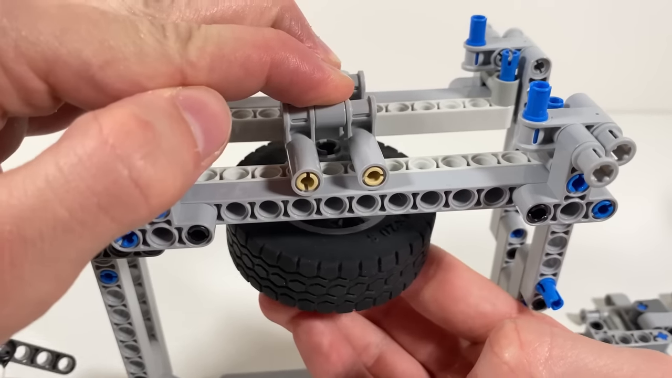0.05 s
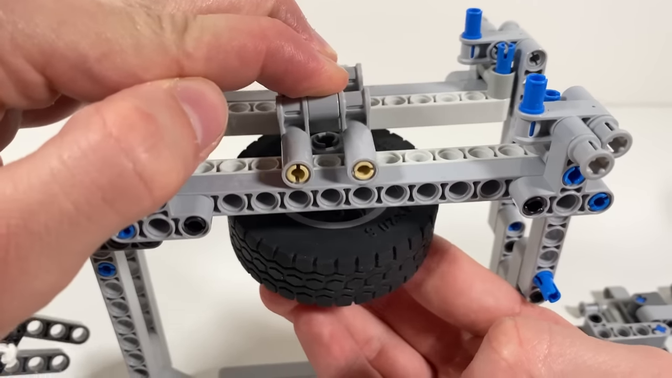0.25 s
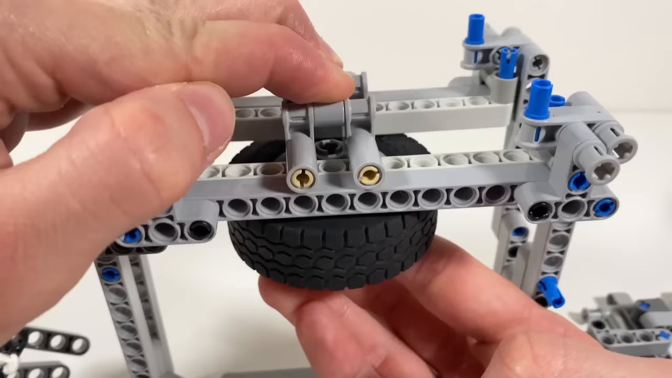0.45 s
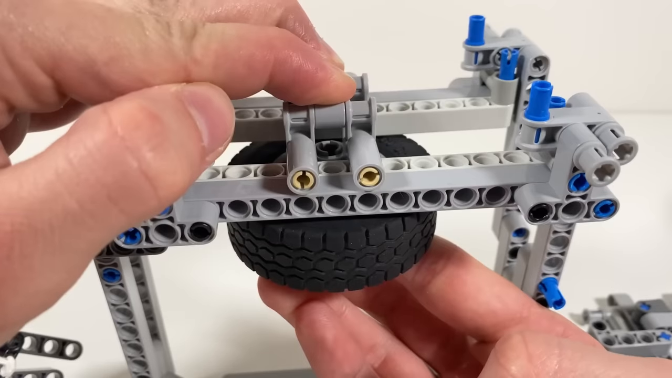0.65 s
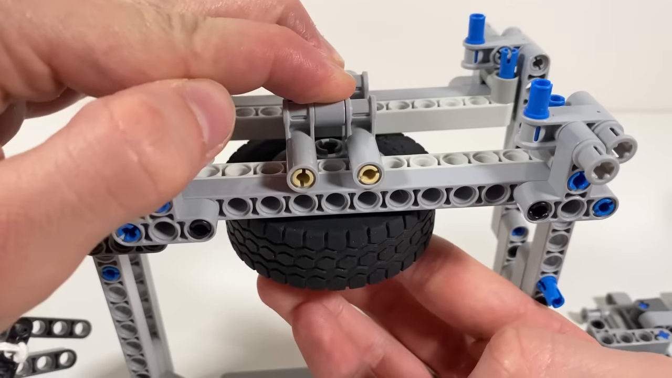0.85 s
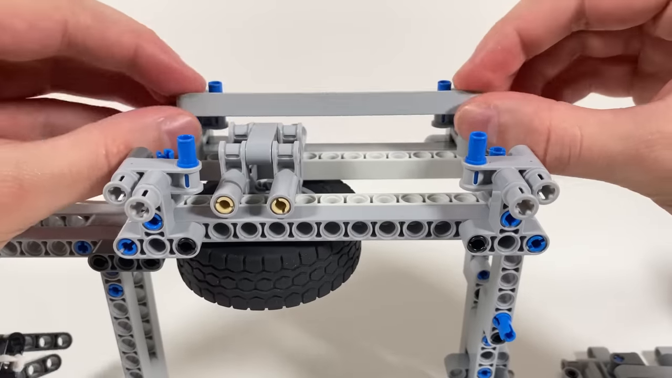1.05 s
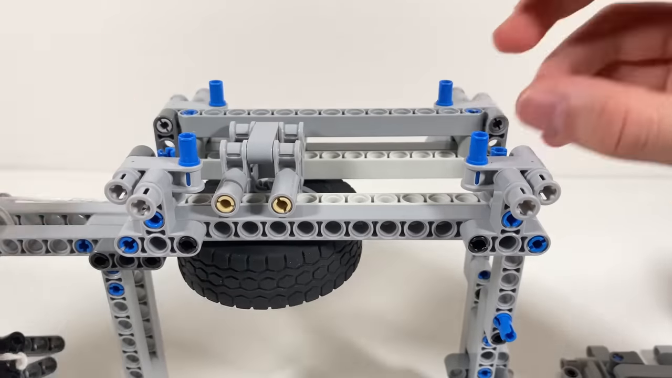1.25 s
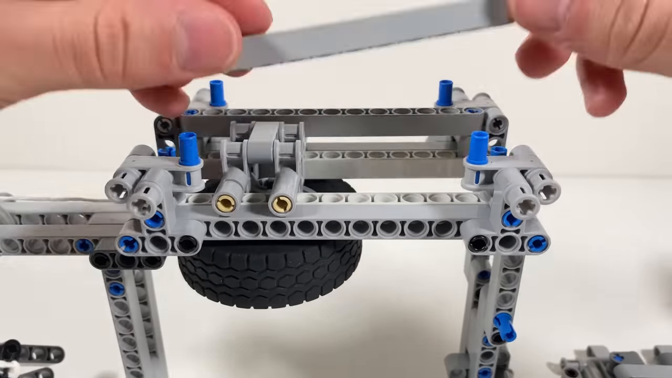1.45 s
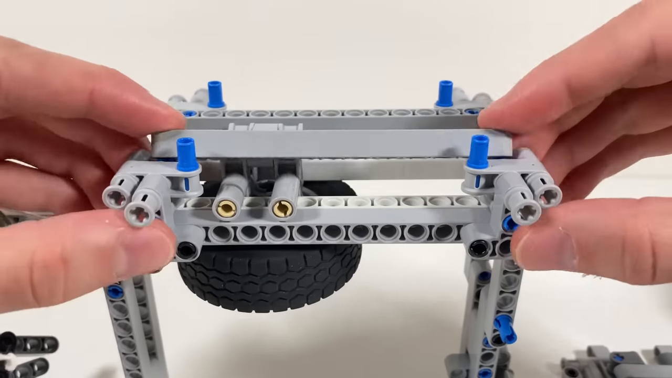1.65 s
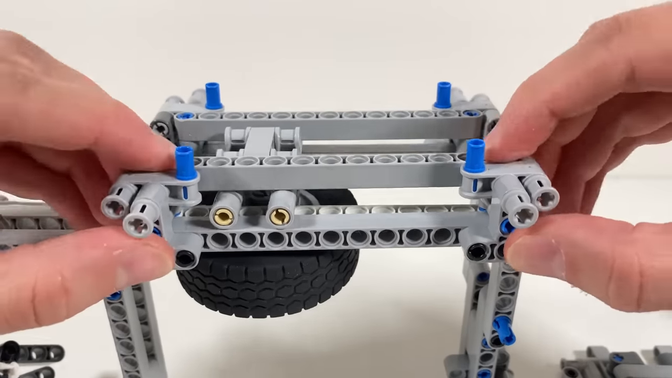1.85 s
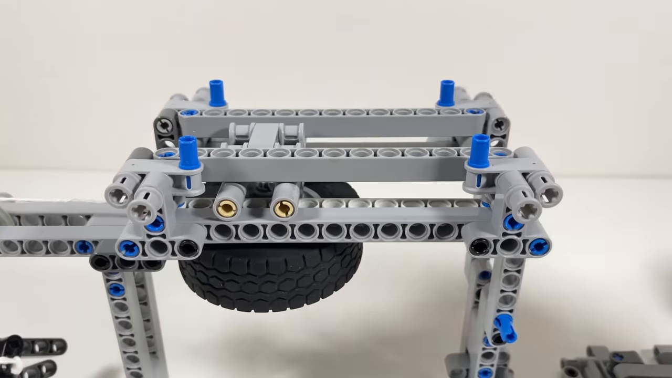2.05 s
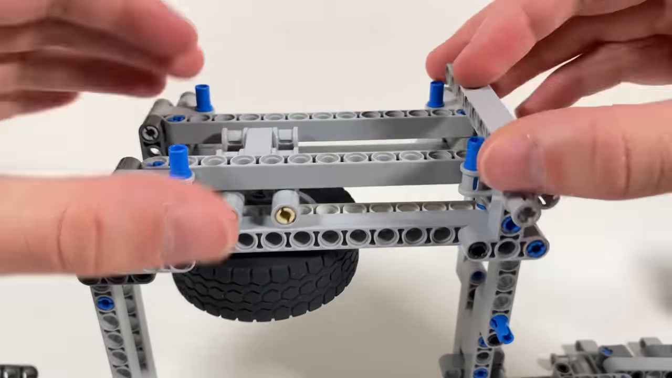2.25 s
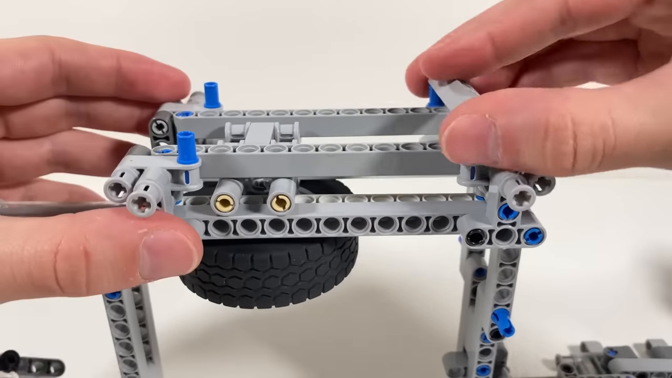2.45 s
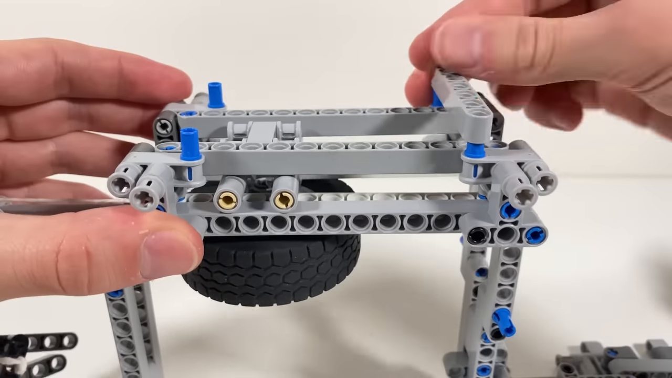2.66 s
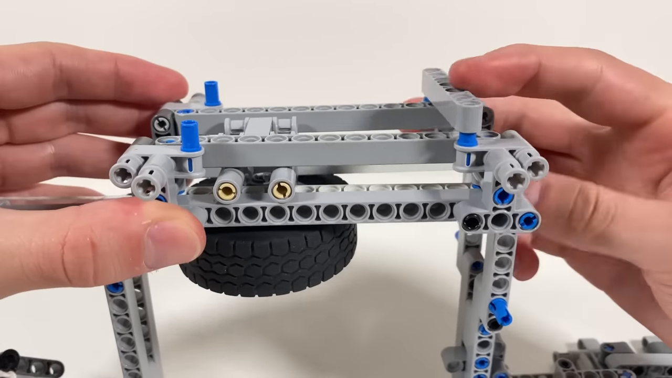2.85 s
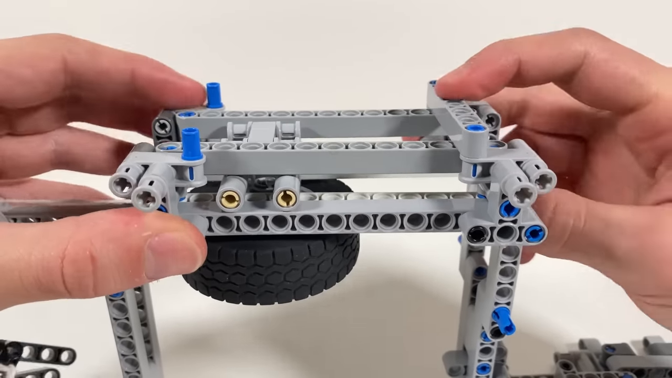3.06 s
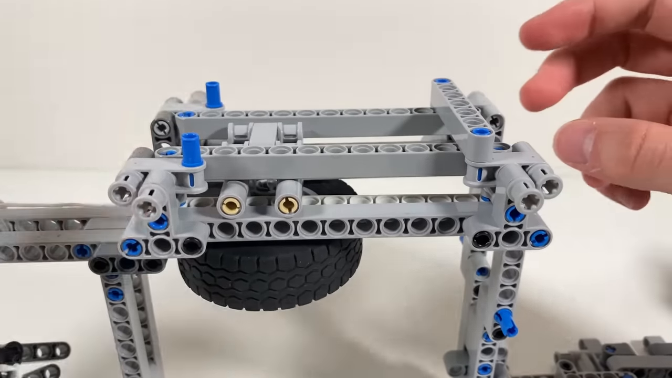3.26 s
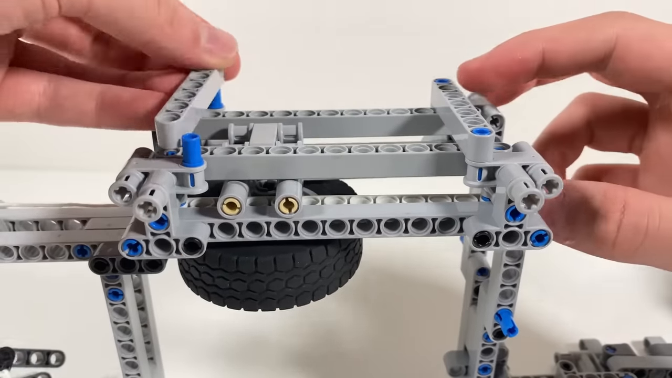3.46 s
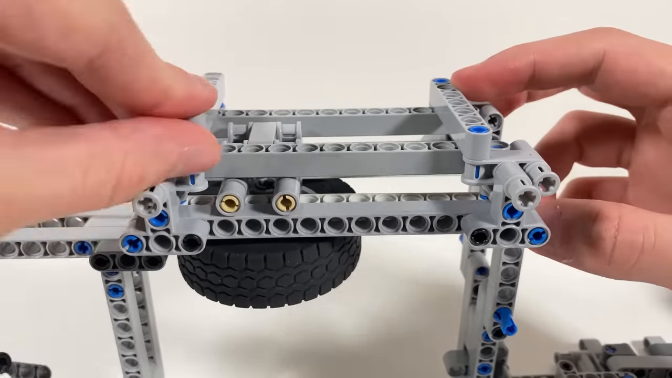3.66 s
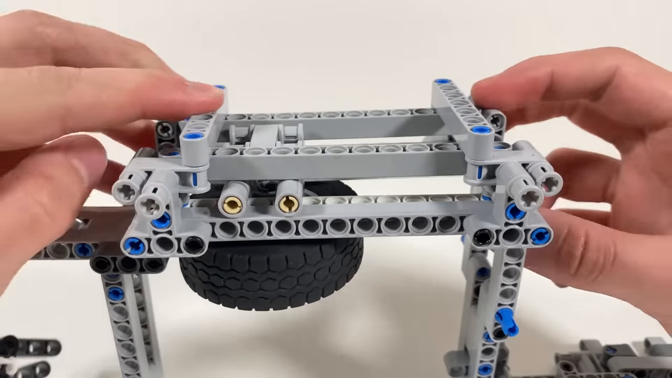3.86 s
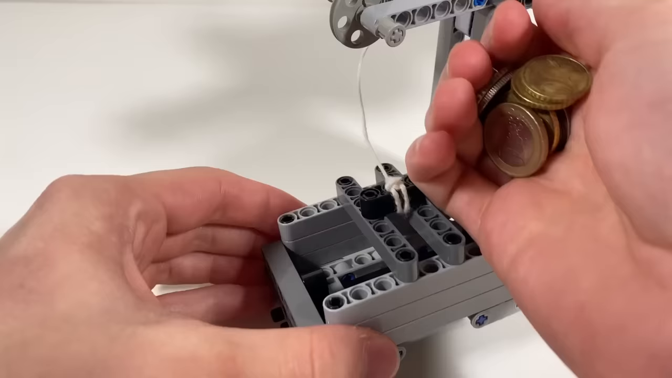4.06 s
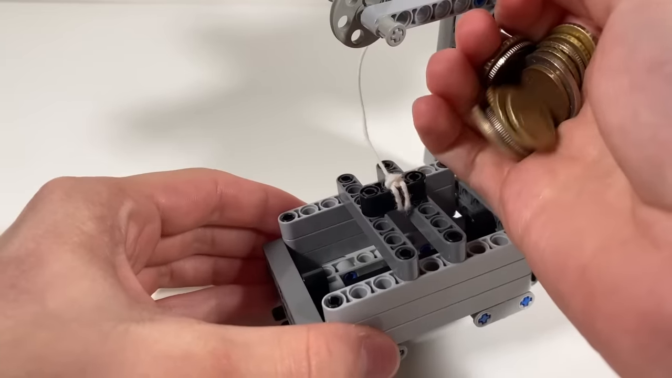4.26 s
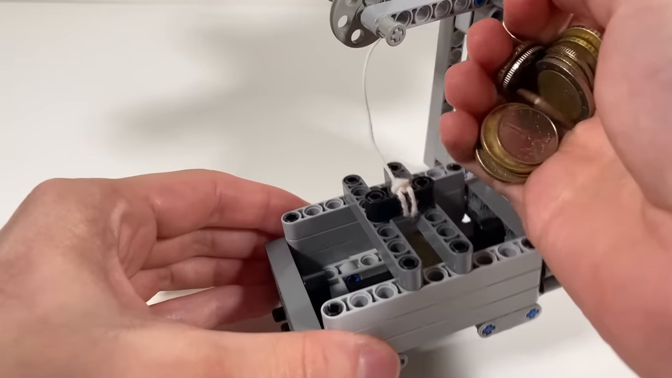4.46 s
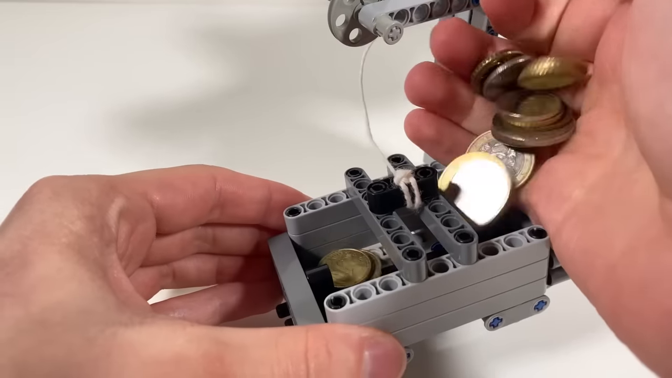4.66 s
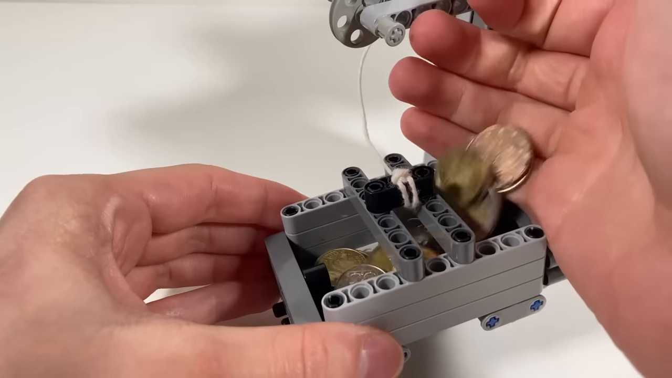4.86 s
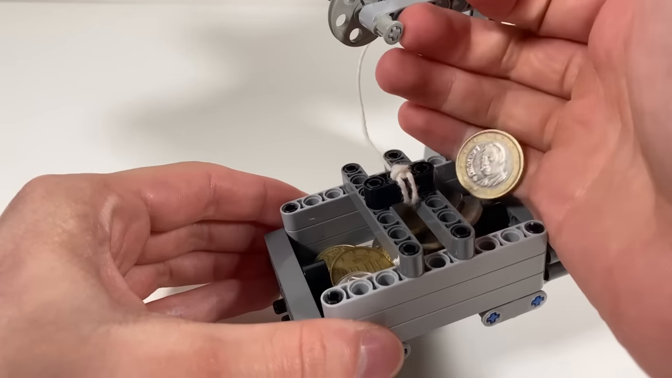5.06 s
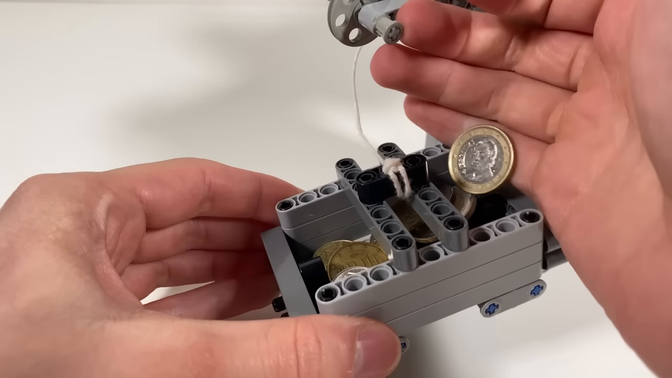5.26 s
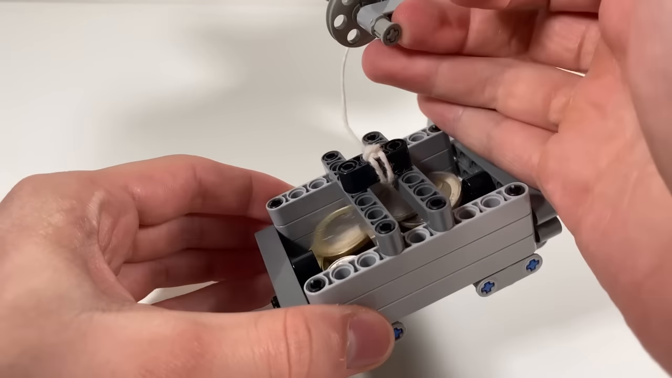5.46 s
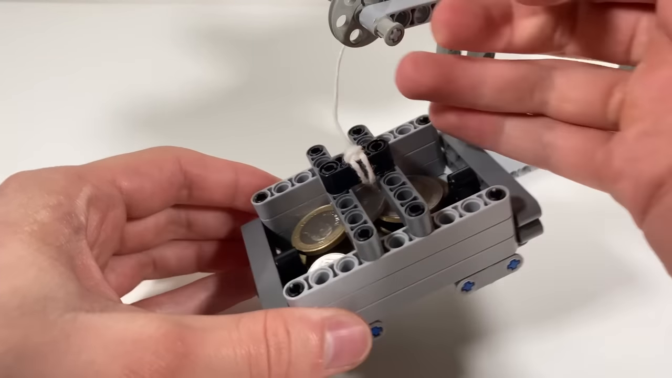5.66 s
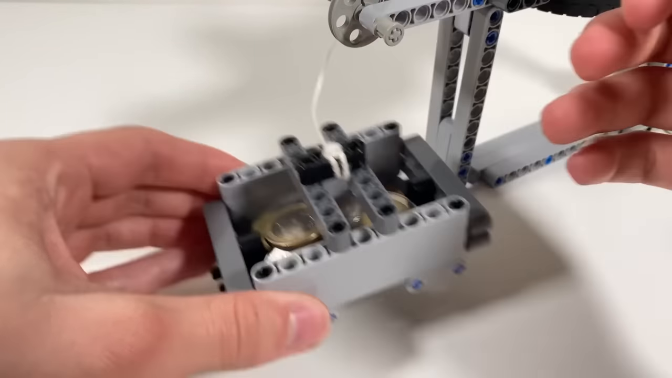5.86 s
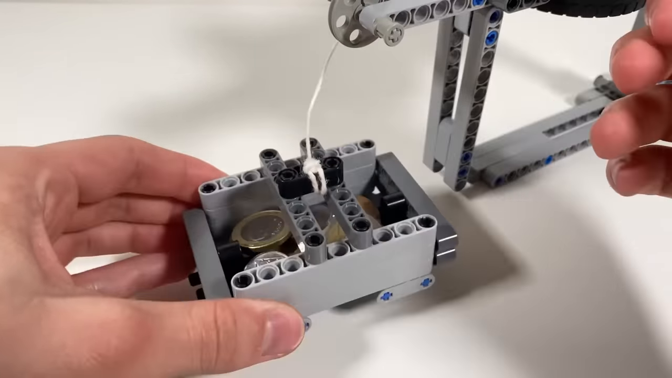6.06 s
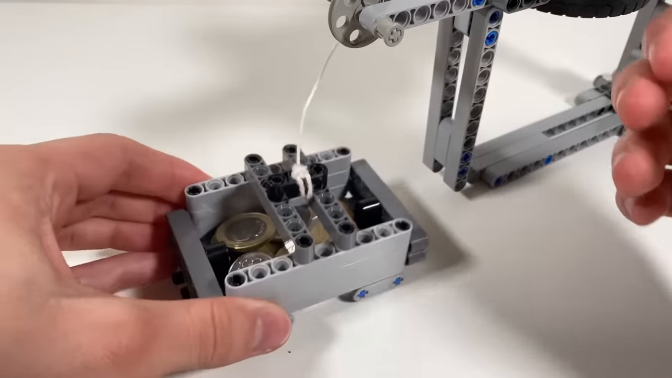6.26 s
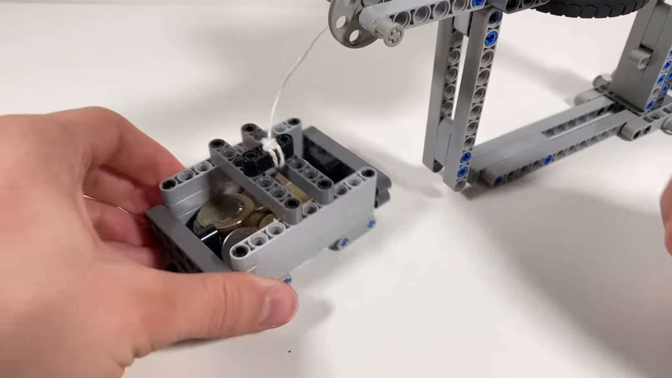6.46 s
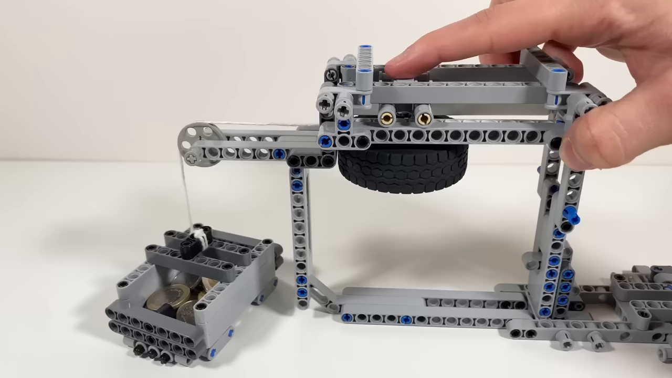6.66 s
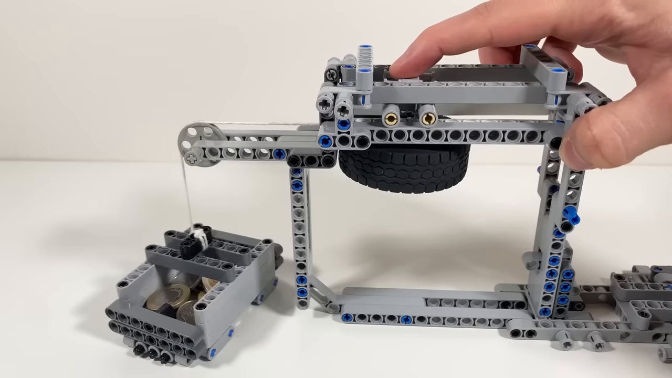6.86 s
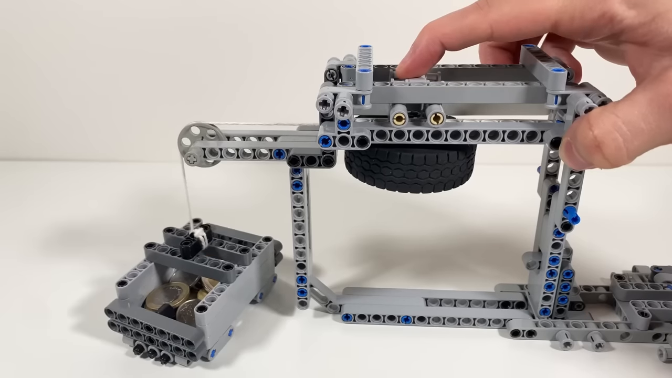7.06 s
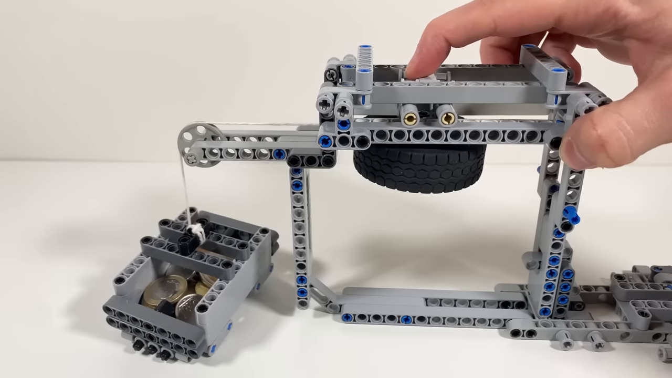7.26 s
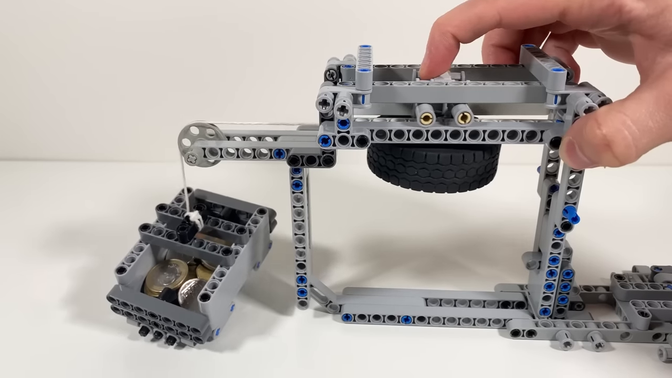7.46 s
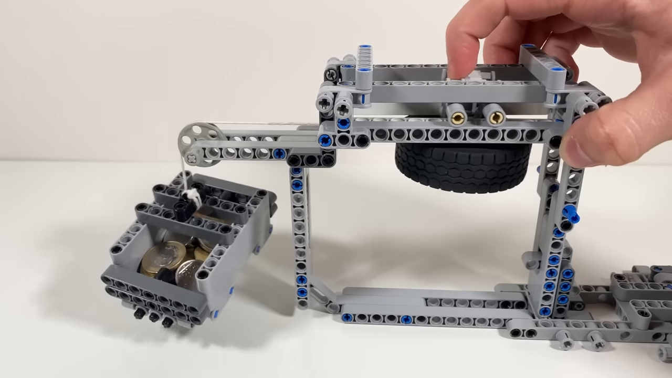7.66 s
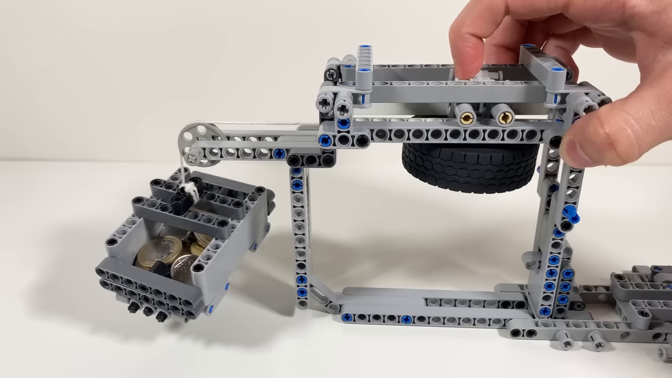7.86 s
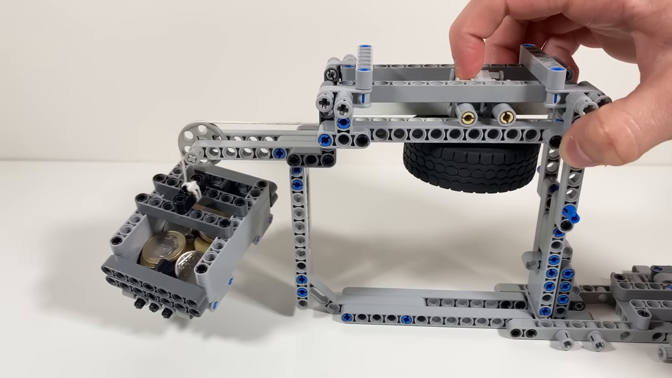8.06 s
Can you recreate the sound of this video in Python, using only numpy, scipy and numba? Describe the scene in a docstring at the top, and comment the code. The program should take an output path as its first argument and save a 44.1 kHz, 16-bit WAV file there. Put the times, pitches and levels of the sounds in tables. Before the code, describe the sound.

Five abruptly cut close stereo shots at an indoor table, over faint steady air noise. At 0.1 s a plastic wheel pushed into a frame thumps loudly and booms, with a cracking plastic knock at 0.4 s, then weak rumbling. From 0.95 to 4 s the sound is dry and thin: plastic beams tick, rattle and snap onto pins, strongest near 1.2, 1.75, 1.85, 2.3, 2.9 and 3.85 s. From 4.15 s coins clink into a plastic box, bright and dense from 4.45 to 5 s, then sparse, with another cluster at 5.3-5.55 s. Around 5.85-6.1 s the box jostles, coins jingling over low rumble; it lands with a knock at 6.3 s and rubs grittily until 6.7 s. Then nearly quiet: a tiny pulley squeak at 6.85 s, faint rumbles and light ticks as it is winched up, until just after 8 s.

```python
"""Plastic beams snap onto pins on a table top: each snap rings three bands of beam modes, over random small ticks.
Coins ring and knock as they are poured into a plastic box, which is set down, slid along and winched up.
A wheel pushed home in a plastic frame booms in the table, which later rumbles faintly; rubbing is noise and grains.
Five hard-cut shots, each with its own room tail and low cut, are heard close by in stereo over steady air noise."""
import sys
import numpy as np
from scipy import signal
from scipy.fft import rfft, irfft, next_fast_len
from scipy.io import wavfile
from scipy.ndimage import uniform_filter1d
from numba import njit

SR = 44100
rng = np.random.default_rng(int(sys.argv[2]) if len(sys.argv) > 2 else 0)


def to_wav(s):
    """Save 16-bit WAV."""
    ch = np.atleast_2d(s).T  # columns
    pcm = np.round(np.clip(ch, -1, 1) * 32767)  # PCM
    wavfile.write(sys.argv[1], SR, pcm.astype(np.int16))


N = 357651
LEAD = 300  # samples of grazing before the main contact

# shots, each lasting until the next: [start t/s, room t60/s, room level/dB, low cut f/Hz, right channel delay/ms]
SHOTS = [(0, 0.5, -12, 41.2, 0.06), (0.938, 0.067, -11.5, 302, 0.063), (4.068, 0.17, -4.5, 57.2, 0.11),
         (5.752, 0.13, -5.5, 46.7, 0.175), (6.682, 0.15, -6, 45, 0.17)]
# nominal modes of plastic beam, coin box and table top: [f/Hz, relative level/dB, t60/s]
BEAM = [(404, -16, 0.005), (612, -8.5, 0.016), (752, -2.5, 0.043), (1099, -5.5, 0.082), (1440, 3, 0.012),
        (1863, 8.5, 0.012), (2345, -2.5, 0.034), (2900, -4.5, 0.018), (3560, -4.5, 0.025),
        (5160, 0.5, 0.011), (6020, -1.5, 0.003), (7800, 5.5, 0.0034), (10300, -4.5, 0.003)]
BOX = [(878, -16, 0.1), (1357, -1.5, 0.036), (2376, -7, 0.02), (3130, 13, 0.011), (3410, 11.5, 0.02),
       (4070, 18, 0.0068), (5060, 19, 0.0087), (5930, 11.5, 0.004)]
TABLE = [(78, -7.5, 0.16), (118.8, -1, 0.16), (165, -1.5, 0.04), (191, 0.5, 0.09), (233, 3.5, 0.13),
         (278, 3.5, 0.053), (393, 4, 0.044), (484, 0.5, 0.034), (568, -3, 0.03), (800, 0.5, 0.03),
         (1150, -8, 0.029), (1590, -1.5, 0.013)]


def snaps():
    """Pins click into beams; where the beam is held decides which modes sound. Small ticks fill in at random."""
    # plastic snaps: [t/s, middle modes peak level/dB, low modes level/dB, high modes level/dB; both re middle]
    snap_events = [(0.941, -42.5, 9, -2), (0.96, -28, -35, 6), (0.998, -21.5, -38, -9),
                   (1.022, -24, -8, -5), (1.069, -20, -32, -8), (1.105, -25, -26, -5),
                   (1.122, -14.5, -11.5, -1), (1.131, -20.5, -7.5, 2.5), (1.14, -23, -5, -2),
                   (1.175, -27.5, -18.5, -4.5), (1.19, -27, -25, -10), (1.228, -10, -4, -9),
                   (1.264, -22.5, -1, -3.5), (1.299, -33.5, -5, -27), (1.353, -17.5, -9, -2.5),
                   (1.538, -56, 15, 11.5), (1.597, -34, -2.5, -24), (1.639, -20, -6, -8.5),
                   (1.695, -36, -14.5, 4.5), (1.719, -28, -27, 1), (1.738, -23.5, -9.5, 2),
                   (1.7447, -6, -17.5, -12), (1.809, -28, -10, -4.5), (1.834, -7, -5, 0.5),
                   (1.901, -42, -19, 15), (1.941, -31, -5, 3), (1.998, -28.5, -4.5, -8),
                   (2.039, -41, 2.5, 12.5), (2.252, -21.5, -7, -2), (2.273, -7, -5, -1.5),
                   (2.334, -25.5, -15, -1), (2.375, -26.5, -9, -6), (2.452, -30, -21, -5),
                   (2.471, -27.5, -4, 8), (2.48, -16, -12.5, 3), (2.491, -29, -2, 12),
                   (2.5, -31.5, -27, 15), (2.513, -17.5, -14.5, 5), (2.536, -22, -12, 4.5),
                   (2.593, -19.5, -15, 7.5), (2.607, -20, -10, -6), (2.619, -30, -11, 13),
                   (2.643, -30, -25, 3), (2.672, -26, -25, 3.5), (2.687, -25.5, -20, -1),
                   (2.727, -24, -7, -0.5), (2.785, -14, -8.5, -0.5), (2.808, -20, -18, -7.5),
                   (2.84, -41, 18, -16), (2.91, -16.5, -30, 5.5), (2.938, -11.5, -25, -1.5),
                   (3.04, -25.5, -17, 0), (3.081, -22, -45, -2), (3.13, -19.5, -31.5, -9),
                   (3.142, -25.5, -4, 4), (3.219, -37.5, -3, 2.5), (3.349, -26.5, -6, -4),
                   (3.376, -22.5, -10, 2), (3.503, -22.5, -1.5, 7), (3.549, -18, -4.5, 10),
                   (3.594, -23.5, -27, 10.5), (3.645, -34, -0.5, -4), (3.695, -27.5, -9, 4),
                   (3.721, -21, -10, 3.5), (3.78, -25, -8.5, -5), (3.852, -15.5, -6.5, -1.5),
                   (3.863, -8, -46.5, 0.5), (3.928, -29.5, -5, 5)]
    # fingers shifting beams: [start t/s, end t/s, level/dB]
    handling = [(.95, 1.2, -48.5), (1.25, 1.31, -57.5), (1.535, 1.65, -51), (1.69, 1.96, -52.5),
                (2.28, 2.41, -52), (2.45, 2.95, -48.5), (3.05, 3.15, -47), (3.36, 3.43, -50.5),
                (3.5, 3.6, -46.5), (3.68, 3.96, -47.5)]
    scrape_db = -6.5  # fine bright scraping, re ticks
    out = np.zeros((2, N))
    low, mid, high = BEAM[:3], BEAM[3:8], BEAM[8:]
    chances = rng.standard_normal((len(snap_events), 700))
    for (s, db, low_db, high_db), chance in zip(snap_events, chances):
        pan_db = .5 + 1.5 * chance[59]
        mid_blow = blow(mid, chance, 4., 0.05, 0.0015, 0.6, graze_s=.0007)
        low_blow = blow(low, chance, 4., 0.06, 0.0012, 0)
        high_blow = blow(high, chance, 0.83, 0.045, 0.00028, 0.25, graze_s=0.0014)
        add(out, s, undb(db) * mid_blow, pan_db)
        add(out, s, undb(db + low_db) * low_blow, pan_db)
        add(out, s, undb(db + high_db) * high_blow, pan_db)
    scrape = chatter(BEAM[6:], 1500., 6., .1, channels=2)
    ticks = chatter(BEAM[1:10], 900., 3.5, 0.06, soft_s=.00012)
    level = bouts(handling, rise_db_s=1999.5, fall_db_s=300.5)
    return out + level * (ticks + undb(scrape_db) * scrape)


def coins():
    """Each clink rings short coin modes and one thin high mode, and knocks the box; sliding coins jingle."""
    # clinks: [t/s, ring peak level/dB, box knock level/dB re ring, top mode level/dB re ring, top mode nominal f/Hz]
    clinks = [(4.134, -42, 1, 4, 15000), (4.1489, -22.5, -15, 7, 15050), (4.17, -20.5, -43, -13, 14350),
              (4.262, -23, -35, -18, 14400), (4.2682, -7, -37, -7, 14600), (4.2832, -8.5, -43, -18, 15600),
              (4.3074, -17.5, -42, -10, 15000), (4.3315, -21.5, -32, -11, 14470),
              (4.3597, -19, -29.5, -17, 15500), (4.4477, -8.5, -22.5, -15, 15200),
              (4.4708, -7.5, 2, -9, 14400), (4.4964, -12, -41, -9, 15200), (4.5212, -17, 10, -6, 15230),
              (4.5353, -10, -35, -4, 15300), (4.5623, -17.5, 10.5, 1.5, 14900),
              (4.607, -16.5, 3.5, -7, 15270), (4.643, -8.5, -9, -14, 15200),
              (4.6643, -10.5, -43, -7, 15000), (4.6696, -4, -33, -11, 14250), (4.6807, -5, -47, -16, 14500),
              (4.713, -9.5, -58, -3, 15120), (4.727, 3, -26, -28, 15100), (4.7325, -12, -3, 8, 15700),
              (4.7372, -2, -9.5, -1, 15350), (4.776, -9.5, -28, -10, 15800), (4.786, -14, -31, 7, 14500),
              (4.7928, -11, -2.5, -5, 15800), (4.81, -22, -19, -5.5, 15700), (4.835, -8.5, -31, 0, 15360),
              (4.8428, -19.5, 3, -5, 15300), (4.859, -4, -42, -3, 15100), (4.8828, -5.5, -15, -10, 15400),
              (4.9002, -14, -3.5, 3, 15700), (4.9152, -4, -28, -9, 14420), (4.9339, -9.5, -11.5, 0, 15300),
              (4.964, -9, -48, -8, 14950), (5.006, -17, -40, -9, 15400), (5.018, -21, -7.5, 3, 15000),
              (5.0633, -23, -2.5, -6, 15100), (5.3111, -28.5, -12, -3, 14200), (5.3373, -21, -8, -8, 13200),
              (5.359, -18, -4.5, 0, 13800), (5.3953, -10, -31, 5.5, 15260), (5.4004, -15.5, -1, -9, 15100),
              (5.4245, -13, -14.5, -13, 15500), (5.434, -14, -19, -9, 13960), (5.4534, -13, -7, -16, 14230),
              (5.4794, -10.5, -13, -8, 13800), (5.4867, -12, -2, -19, 13990),
              (5.5102, -12.5, -28, -19, 15410), (5.5425, -13.5, -25, -14, 14050),
              (5.5696, -26.5, -12, -22, 13540), (5.7727, -45.5, 16.5, -26, 15040),
              (5.8501, -15, 3.5, -5, 14500), (5.913, -2, -26, -17, 15600), (5.929, -11.5, -1.5, -13, 14370),
              (5.943, -15.5, 8, -9, 15300), (6.013, -20.5, 6, -2, 14200), (6.027, -19, -26, -9, 15500),
              (6.0648, -31.5, 9, -21, 15020), (6.0816, -21, -18, -9, 14000), (6.1936, -38, -9, -8, 14300)]
    # nominal coin modes: [f/Hz, relative level/dB, t60/s]
    coin = [(7000, 4.5, 0.0026), (8300, 2.5, 0.0032), (10390, 10.5, 0.047), (10890, 1, 0.011),
            (11700, 10, 0.026), (11580, 5, .014), (12600, 1, .01)]
    # coins sliding over each other: [start t/s, end t/s, jingle level/dB, box chatter level/dB]
    pours = [(4.48, 4.64, -46.5, -50.5), (4.66, 5.03, -37, -48.5), (5.41, 5.52, -45, -50),
             (5.86, 6.08, -42.5, -47.5), (6.12, 6.26, -58, -58.5)]
    sing_t60_s = 0.072  # the top mode, a thin high ring with its own pitch in each clink
    box_dulling_db_s = 10.5  # the filling box loses its upper modes
    out = np.zeros((2, N))
    chances = rng.standard_normal((len(clinks), 700))
    for (s, db, box_db, sing_db, sing_hz), chance in zip(clinks, chances):
        pan_db = .5 + 2. * chance[59]
        ring = blow(coin, chance, 3., 0.025, 0.0012, 1., graze_s=.0009)
        sing = blow([(sing_hz, 0, sing_t60_s)], chance, 0, .004, .003, 0, graze_s=.002)
        dull_db = box_dulling_db_s * (s - clinks[0][0])
        box = [(hz, mode_db - dull_db * (hz > 2500), t60) for hz, mode_db, t60 in BOX]
        knock = blow(box, chance, 3., .05, .0015, .8, graze_s=.0008)
        add(out, s, undb(db) * ring, pan_db)
        add(out, s, undb(db + sing_db) * sing, pan_db)
        add(out, s, undb(db + box_db) * knock, pan_db + 1.5)
    jingle = chatter(coin, 900., 4., .04)
    box_chatter = chatter(BOX, 500., 4., .06, soft_s=.0001, channels=2)
    out += bouts(pours, 283, 178.5, column=2) * jingle
    return out + bouts(pours, 283, 178.5, column=3) * box_chatter


def table():
    """Blows crack plastic, boom in the table top and set the frame shuddering; lighter rocking murmurs."""
    # blows reaching the table: [t/s, level/dB, crack level/dB, crack treble level/dB, boom level/dB; last three re level]
    thumps = [(0.088, -1, -1.5, -17.5, -6.5), (0.272, -28, -25, -40, -5.5), (0.376, -10, 10.5, 3.5, -1),
              (0.81, -41.5, -23, -34, -12), (0.873, -33, -28, -30, -1), (0.904, -44.5, -2, 2.5, 4),
              (2.144, -41, -40, -50, 16), (5.558, -35, -6, -8, -5), (6.296, -9, 3, -14, -7.5),
              (6.666, -29, 10.5, -23, -9.5), (6.88, -52, 0.5, -15, -6.5), (7.493, -49, -0.5, -8.5, -7),
              (7.623, -38.5, -9.5, -22, -5)]
    # frame and box rocking: [start t/s, end t/s, boom level/dB, upper modes level/dB]
    rocking = [(0.005, .06, -62, -64), (.5, .75, -52.5, -65.5), (.79, .93, -69, -54),
               (4.09, 4.12, -74, -77), (4.22, 4.3, -61, -63.5), (4.48, 5.2, -79, -66.5),
               (5.57, 5.7, -56, -65), (5.84, 6.09, -38, -55), (6.16, 6.18, -41.5, -56),
               (6.4, 6.68, -68.5, -47), (6.9, 7.03, -51.5, -60), (7.22, 7.42, -52.5, -56),
               (7.5, 7.56, -66.5, -58), (7.62, 7.7, -54.5, -65.5), (7.88, 7.91, -61.5, -68.5),
               (8.0, 8.11, -73, -89)]
    shudder_delay_s, shudder_boom_db, shudder_upper_db = 0.011, -35, -18  # levels re blow
    out, opposed = np.zeros((2, N)), np.zeros((2, N))

    def soften(x):
        """A heavy thing pushes long: smooth twice over 9 samples."""
        return uniform_filter1d(uniform_filter1d(x, size=9), size=9)

    chances = rng.standard_normal((len(thumps), 700))
    for (s, db, crack_db, treble_db, boom_db), chance in zip(thumps, chances):
        body = soften(blow(TABLE[3:], chance, 0.27, 0.0052, 0.0075, 0))
        boom = soften(blow(TABLE[:3], chance, 0.27, 0.051, 0.0026, 0))
        knock = blow(TABLE[6:10], chance[::-1], 1.5, 0.015, 0.0018, 0)
        side = soften(blow(TABLE[6:], chance[::-1], 0.65, 0.033, 0.0038, 0))
        crack = blow(BEAM[3:9], chance, 1, .1, .003, 6., graze_s=.0018)
        treble = blow(BEAM[9:], chance, 0, .12, .002, 5., graze_s=.0018)
        add(out, s + 0.001, undb(db) * body)
        add(out, s + 0.0065, undb(db + boom_db) * boom)
        add(out, s, undb(db - 6) * knock)
        add(opposed, s + 0.002, undb(db - 4.5) * side)
        add(out, s, undb(db + crack_db) * crack)
        add(out, s, undb(db + treble_db) * treble)
    shudder = [(s + shudder_delay_s, s + shudder_delay_s, db + shudder_boom_db, db + shudder_upper_db)
               for s, db, *_ in thumps]

    def level(column):
        """Gain of rocking plus shudder."""
        return bouts(rocking, 246, 164.5, column) + bouts(shudder, 1194.5, 167, column)

    low_murmur = level(column=2) * chatter(TABLE[:2], 200., .8, .04, soft_s=.004)
    high_murmur = level(column=3) * chatter(TABLE[2:], 410.0, 1.2, 0.1, soft_s=0.00014)
    # higher modes move the top in opposite senses under the two microphones
    return out + opposed * [[1], [-1]] + low_murmur + high_murmur


def rubbing():
    """Box and string rub: gritty friction noise, stick-slip grains ringing box and table, one thin pulley squeak."""
    # rubbing: [start t/s, end t/s, hiss gain/dB, low modes level/dB, high modes level/dB]
    rubs = [(6.33, 6.43, -42, -56, -46), (6.43, 6.6, -43, -42.5, -52), (6.6, 6.68, -47, -60, -58),
            (6.7, 6.76, -69, -90, -80), (6.88, 6.93, -79.5, -69, -84), (7.22, 7.5, -86, -87, -84),
            (7.5, 7.58, -67, -78, -84), (7.62, 7.65, -65.5, -65, -66)]
    # friction hiss spectrum: [f/Hz, relative level/dB per Hz]
    hiss_spectrum = [(200, -7.5), (540, -9.5), (900, -20), (1600, -15), (4000, -26.5), (11000, -35.5),
                     (14000, -31), (16500, -50)]
    # string squeaking on its pulley: [start t/s, end t/s, gain/dB]
    squeaks = [(6.81, 6.88, -71)]
    squeak_hz = 2808  # mean
    grit = undb(2.0 * unit(uniform_filter1d(rng.standard_normal(N), size=500)))
    # part common to both microphones, part different
    hiss = coloured(hiss_spectrum, channels=1) + 1.01 * coloured(hiss_spectrum, channels=2)
    low = chatter(TABLE[7:9] + BOX[:2], 350., 4., .015)
    high = chatter(BOX[2:], 900., 3.5, .06, channels=2)
    waver = 1 + 0.013 * uniform_filter1d(rng.standard_normal(N), size=100)
    squeak = np.sin(2 * np.pi * np.cumsum(squeak_hz * waver) / SR)
    out = bouts(squeaks, rise_db_s=200, fall_db_s=600) * squeak
    for column, layer in enumerate((grit * hiss, low, high), start=2):
        out = out + bouts(rubs, 380, 229, column) * layer
    return out


def air():
    """Steady background noise, strongest near 263 Hz, independent in the two channels."""
    # air noise spectrum: [f/Hz, relative level/dB per Hz]
    air_spectrum = [(120, -66), (200, -42), (263, 0), (529, -16.5), (933, -19), (1370, -19.5), (13800, -34),
                    (16000, -46.5)]
    level_db = -73.5
    return undb(level_db) * coloured(air_spectrum, channels=2)


def blow(modes, chance, scatter_db, detune, contact_s, crack, graze_s=0.0004):
    """One blow of peak 1: a crack and modes of random share, driven by a flurry of contacts."""
    # chance: partial detuning from 0, mode shares from 40, contacts from 60
    hz, db, t60 = (c[:, None] for c in partials(modes, chance, detune))
    share = np.repeat(chance[40:40 + len(modes)], 3)[:, None]
    t = np.arange(int(t60.max() * SR)) / SR
    envelope = undb(db + scatter_db * share - 60 * t / t60)
    ring = (envelope * np.sin(2 * np.pi * hz * t)).sum(0)
    ring[1:4] += crack * np.abs(ring).max() * np.array([1, 1, .4])
    since = (np.arange(len(chance) - 60) - LEAD) / SR
    contact_decay = np.exp(np.where(since < 0, since / graze_s, -since / contact_s))
    flurry = chance[60:] ** 3 * contact_decay
    flurry[LEAD] = 4  # main contact
    out = signal.fftconvolve(ring, flurry)
    # small things radiate no bass
    out = signal.sosfilt(signal.butter(2, 0.7 * modes[0][0], "high", fs=SR, output="sos"), out)
    return out / np.abs(out).max()


def chatter(modes, rate_hz, spread_db, detune, soft_s=0., channels=1):
    """Random tiny contacts of uneven size ring the modes, whose pitch shifts as the pieces move; rms 1."""
    size_db = spread_db * np.minimum(rng.exponential(size=(channels, N)), 4)
    struck = rng.random((channels, N)) < rate_hz / SR
    hits = struck * rng.standard_normal((channels, N)) * undb(size_db) + 1e-18  # offset avoids denormals
    hits = uniform_filter1d(hits, 1 + int(soft_s * SR))  # a soft contact pushes longer
    hz, db, t60 = partials(modes, np.zeros(60), 0)
    hold = SR // 25  # samples per pitch
    bent_hz = hz[:, None] * (1 + detune * rng.standard_normal((len(hz), N // hold + 1)))
    turn = 2 * np.pi * np.clip(bent_hz, 0, .45 * SR) / SR
    keep = undb(-60 / (t60 * SR))
    return unit(np.array([resonate(h, turn, keep, undb(db), hold) for h in hits]))


def partials(modes, bend, detune):
    """Each mode is a cluster of three partials, spread by bend."""
    hz, db, t60 = np.repeat(modes, 3, axis=0).T
    return np.minimum(hz * (1 + detune * bend[:len(hz)]), .45 * SR), db, t60


@njit
def resonate(hits, turn, keep, gain, hold):
    """Sum of decaying modes whose pitch (radians per sample) is set anew every hold samples."""
    out = np.zeros(len(hits))
    for m in range(len(keep)):
        z = 0j
        for b in range(turn.shape[1]):
            p = keep[m] * np.exp(1j * turn[m, b])
            for i in range(b * hold, min((b + 1) * hold, len(hits))):
                z = z * p + hits[i]
                out[i] += gain[m] * z.imag
    return out


def coloured(points, channels):
    """Noise of rms 1 with a spectrum given on a log-frequency axis."""
    hz, db = np.transpose(points)
    size = next_fast_len(N)
    axis_hz = np.maximum(np.arange(size // 2 + 1) * SR / size, 1)
    shape = undb(np.interp(np.log(axis_hz), np.log(hz), db))
    white = rng.standard_normal((channels, size))
    return unit(irfft(rfft(white) * shape, size)[:, :N])


def undb(db):
    """Amplitude ratio of a level in dB."""
    return 10 ** (np.asarray(db) / 20)


def unit(x):
    """Scale to rms 1."""
    return x / np.sqrt(np.mean(x ** 2))


def add(out, s, sound, pan_db=0.):
    """Lay a blow into both channels, main contact at s, left louder for positive pan; it stops at a cut."""
    i = int(s * SR) - LEAD
    sound = sound[:int(next_cut(s) * SR) - i]
    out[:, i:i + len(sound)] += sound * undb([[pan_db / 2], [-pan_db / 2]])


def bouts(rows, rise_db_s, fall_db_s, column=2):
    """Gain along time: each bout rises to its level, holds from start to end and falls away, or stops at a cut."""
    t, rows = np.arange(N) / SR, np.array(rows)
    start, end = rows[:, :1], rows[:, 1:2]
    off_db = rise_db_s * np.maximum(start - t, 0) + fall_db_s * np.maximum(t - end, 0)
    gain = undb(rows[:, column, None] - off_db)
    return (gain * (t < next_cut(start))).max(0)


def next_cut(s):
    """Time in s of the cut that ends the shot sounding at s."""
    cuts = np.array([row[0] for row in SHOTS] + [N / SR])
    return cuts[np.searchsorted(cuts, s, side="right")]


def shot(x, t60_s, room_db, cut_hz, delay_ms):
    """One shot: decaying-noise room tail, later direct arrival on the right, low cut."""
    t = np.arange(int(t60_s * SR)) / SR
    noise = rng.standard_normal((2, SR))[:, :len(t)]
    dull = signal.sosfilt(signal.butter(1, 5000, fs=SR, output="sos"), noise)
    # soft furnishings swallow the treble sooner
    treble = 0.49 * (noise - dull) * undb(-25 * t / t60_s)
    mid, side = (dull + treble) * undb(-60 * t / t60_s) * (t > .002)
    # long waves reach both microphones alike
    side = signal.sosfilt(signal.butter(4, 350, "high", fs=SR, output="sos"), side)
    tail = np.array([mid + side, mid - side])
    tail = tail / np.sqrt((tail ** 2).sum(1, keepdims=True))
    wet = signal.fftconvolve(x, tail, axes=1)[:, :x.shape[1]]
    taps = np.arange(-24, 25)
    # windowed sinc: fractional-sample delay
    late = [np.sinc(taps - d) * np.clip(1 - ((taps - d) / 16) ** 2, 0, 1) ** 2
            for d in (0, delay_ms * SR / 1000)]
    direct = signal.fftconvolve(x, np.array(late), mode="same", axes=1)
    low_cut = signal.butter(6, cut_hz, "high", fs=SR, output="sos")
    return signal.sosfilt(low_cut, direct + undb(room_db) * wet)


def scene():
    """Each shot is cut from its own stretch: nothing rings on across a cut."""
    dry = snaps() + coins() + table() + rubbing() + air()
    cuts = [int(row[0] * SR) for row in SHOTS] + [N]
    shots = [shot(dry[:, a:b], *row[1:]) for row, a, b in zip(SHOTS, cuts, cuts[1:])]
    return np.concatenate(shots, axis=1)


def record(dry):
    """The recorder rounds the loudest peaks and cuts the top."""
    top_hz = 16150
    rounded = .92 * np.tanh(dry / .92)
    return signal.sosfilt(signal.ellip(10, .2, 80, top_hz, fs=SR, output="sos"), rounded)


dry = scene()
out = record(dry)
to_wav(out)
```